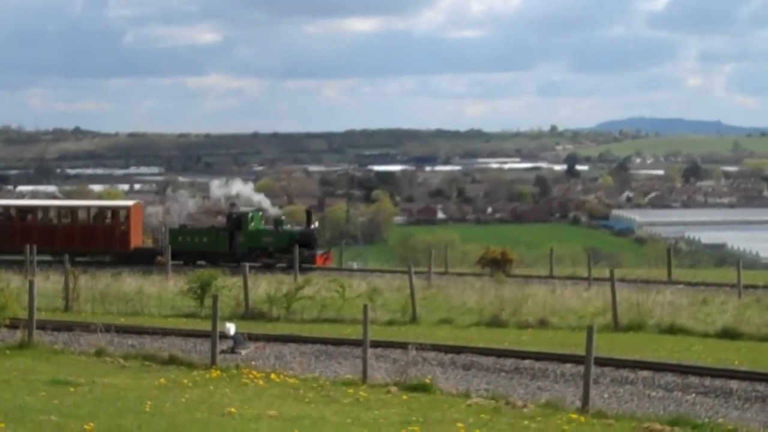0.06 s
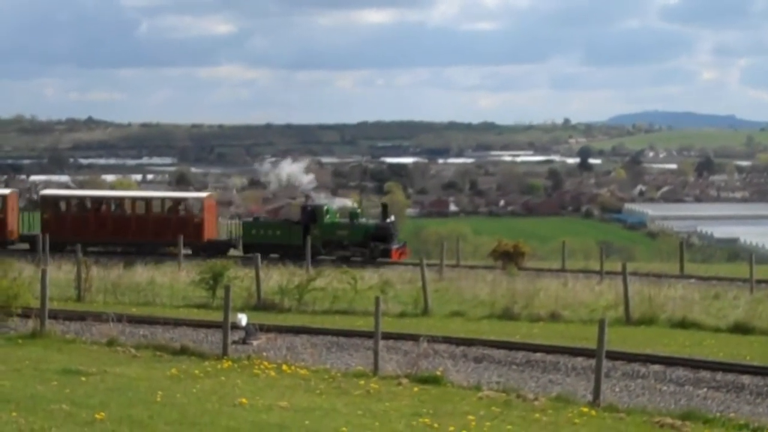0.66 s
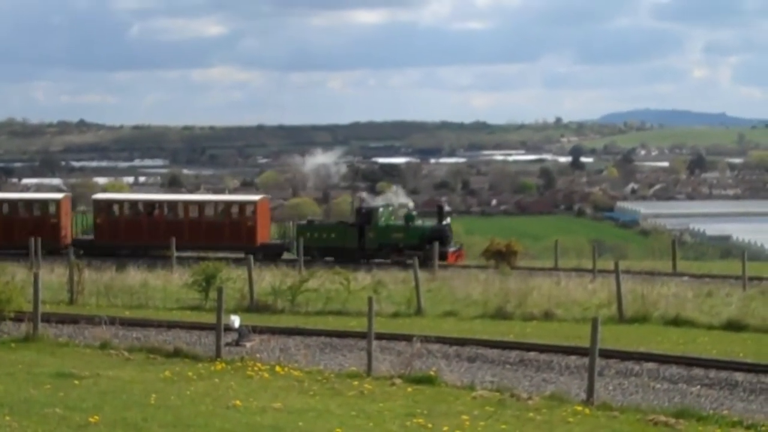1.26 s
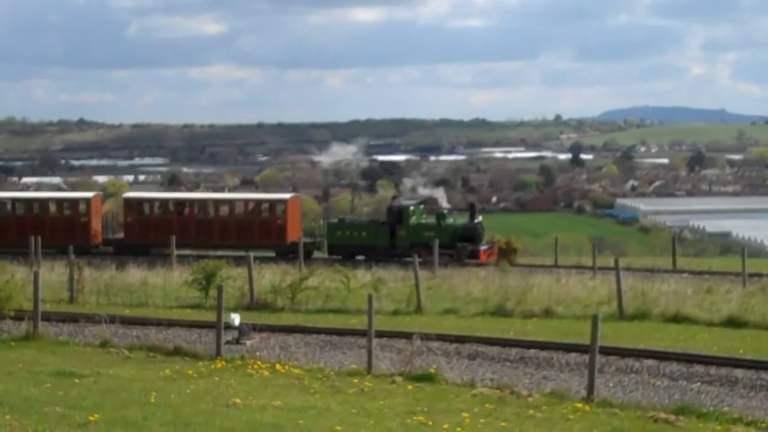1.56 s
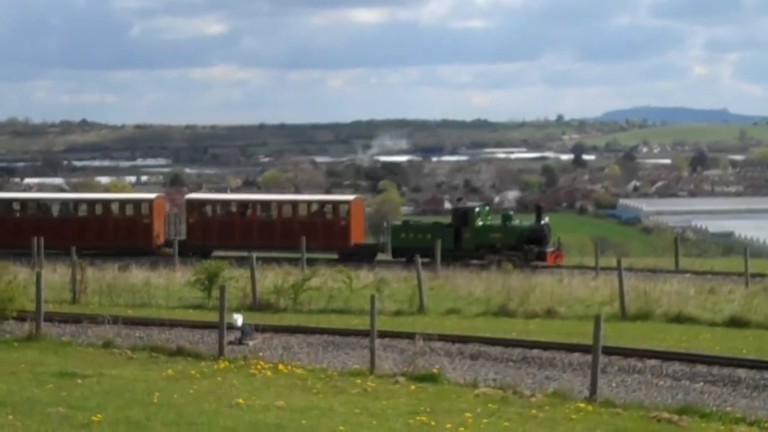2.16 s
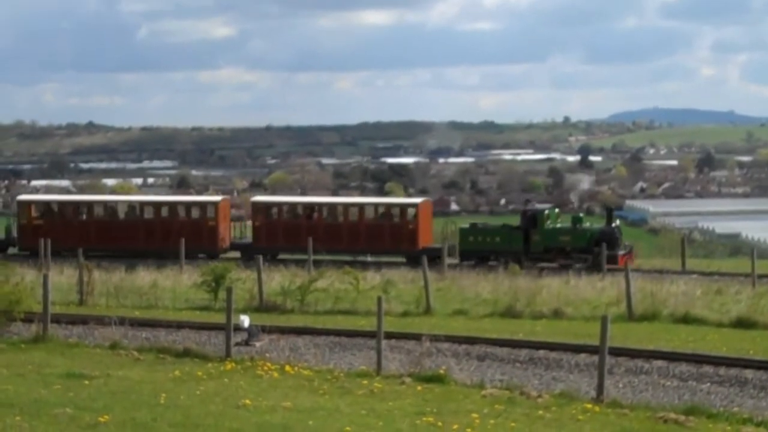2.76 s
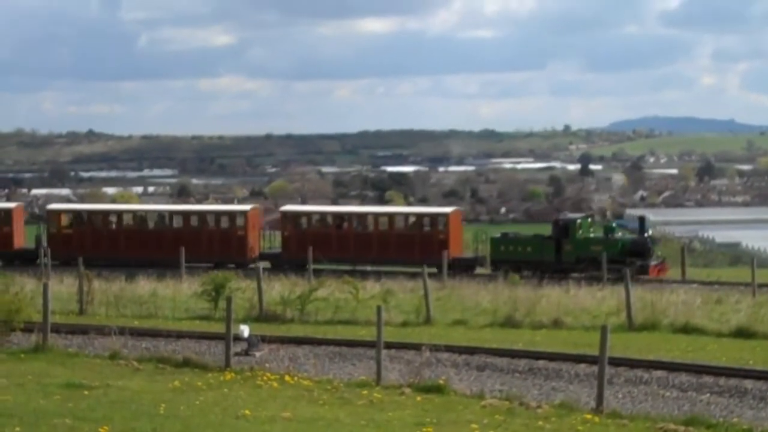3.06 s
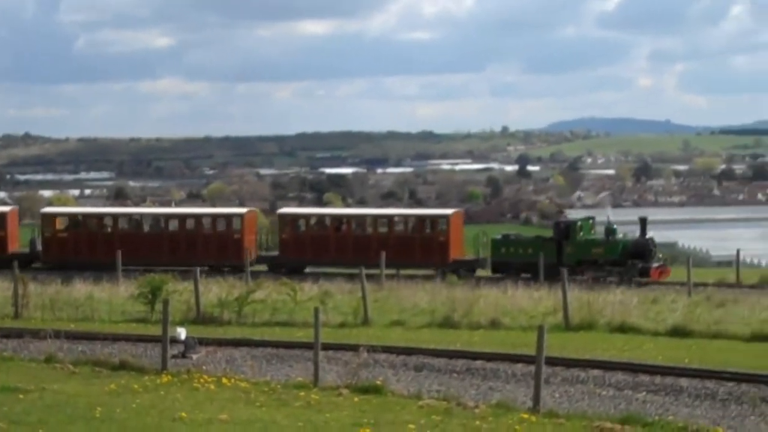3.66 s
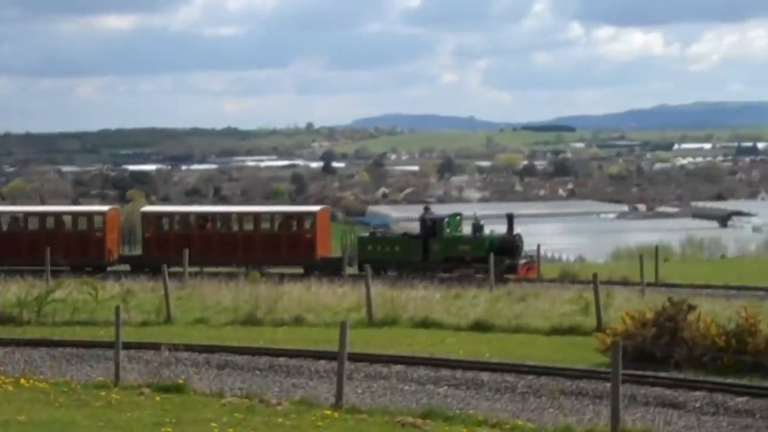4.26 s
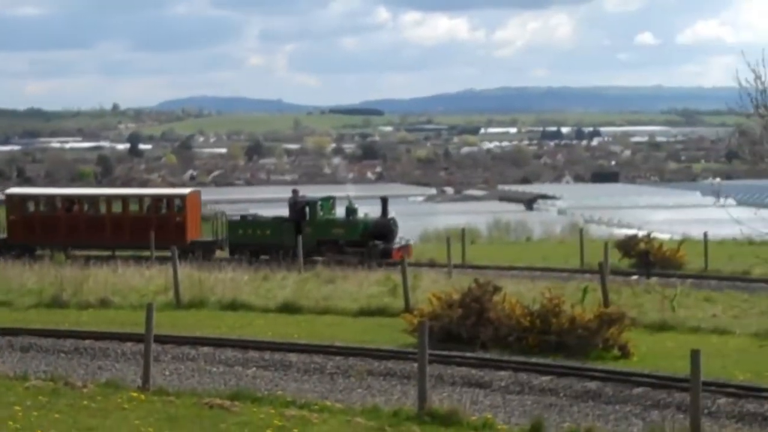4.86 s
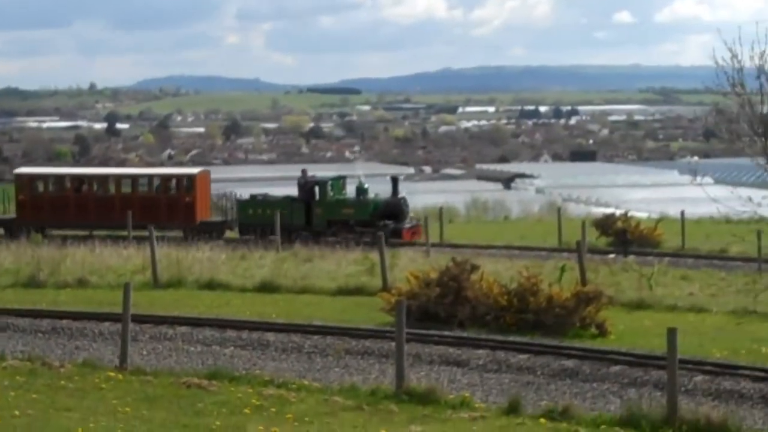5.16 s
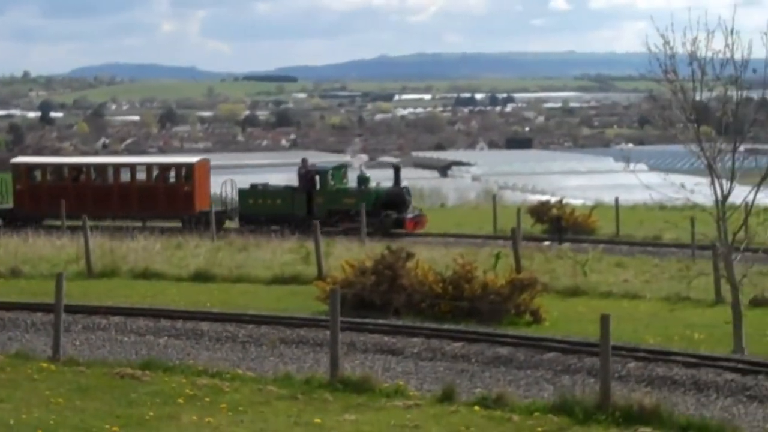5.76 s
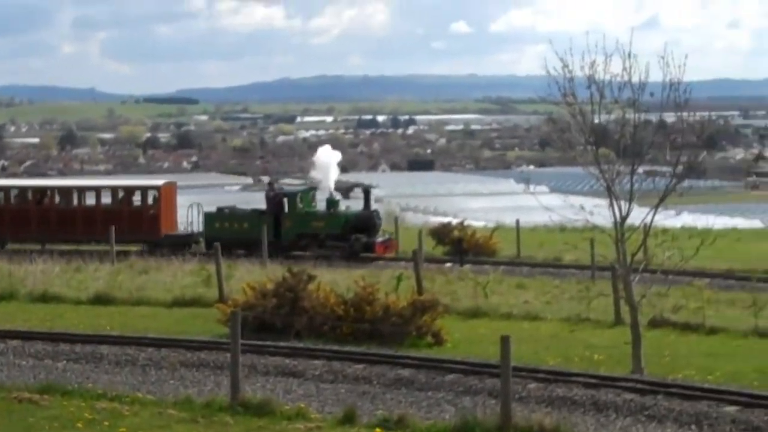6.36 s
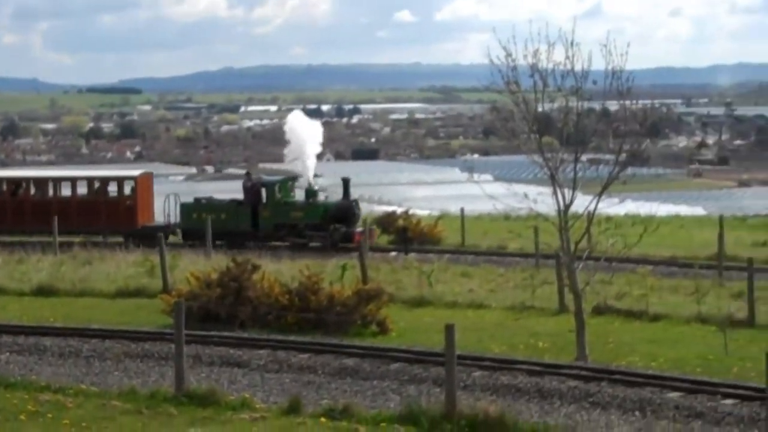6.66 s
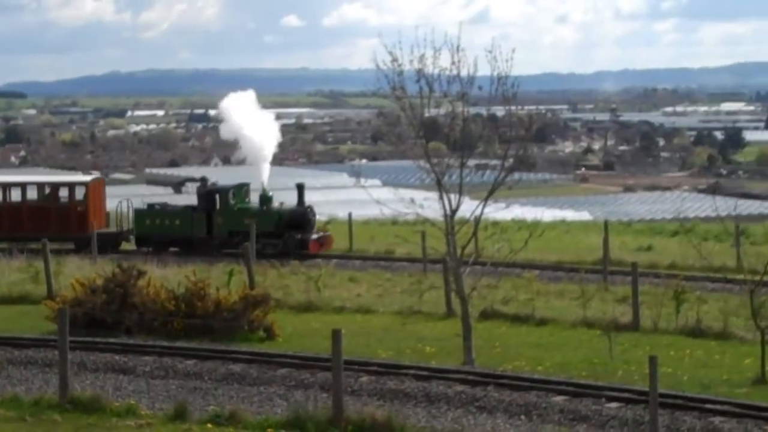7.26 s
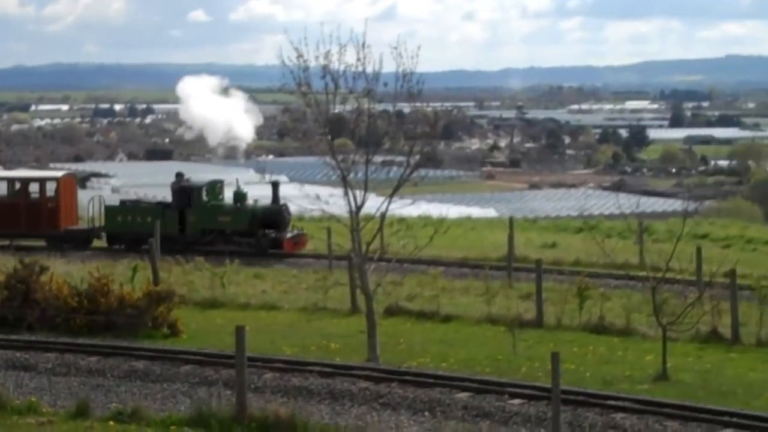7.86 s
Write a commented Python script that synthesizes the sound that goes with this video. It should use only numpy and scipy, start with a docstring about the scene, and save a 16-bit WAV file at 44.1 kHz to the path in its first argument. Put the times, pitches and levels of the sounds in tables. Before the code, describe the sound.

Wheels knock and couplings clank as a little steam train rolls by, ending with a single steamy whistle in a light breeze.

```python
"""A small steam train coasts past across a field. Its wheels roar on uneven rail, knock over the
joints and ring; couplings clash, chains rattle and steam leaks. A bird sings briefly, distant roads
and grass murmur, and a light breeze buffets the camera's microphone. Near the end a jet of steam
blows the whistle once: its pitch rises as the pipe heats, and it echoes off the land."""
import sys
import numpy as np
from scipy import signal
from scipy.fft import rfft, irfft
from scipy.io import wavfile

SR = 44100
rng = np.random.default_rng(int(sys.argv[2]) if len(sys.argv) > 2 else 0)


def wav_out(sig):
    """Save sig, one row per channel (or a flat mono array), as 16-bit PCM at SR to the path in sys.argv[1]."""
    wavfile.write(sys.argv[1], SR, np.round(np.clip(np.atleast_2d(sig).T, -1, 1) * 32767).astype(np.int16))


N = 352794
TIME = np.arange(N) / SR

# The bright clash and the dull body of a knock. Each row: frequency in Hz, relative level in dB.
CLASH_SPECTRUM = [(1500, -16), (3000, -1), (4200, 7), (5600, 9), (7400, 7), (8200, 1), (9000, -26),
                  (11500, -42)]
BODY_SPECTRUM = [(150, -3), (400, -7.5), (700, -2.5), (1200, 1), (2400, 5), (3200, -1.5), (4500, -6)]


def undb(db):
    """Turn decibels into a number to multiply a sound by."""
    return 10 ** (np.asarray(db) / 20)


def unit(x):
    """Scale a signal to an average strength (rms) of 1."""
    return x / np.sqrt(np.mean(x ** 2))


def curves(table):
    """Join each column's values by straight lines; the first column gives the times."""
    s, *columns = np.transpose(table)
    return [np.interp(TIME, s, column) for column in columns]


def ramp(start_s, length_s):
    """Rise from 0 to 1 in a straight line, then hold."""
    return np.clip((TIME - start_s) / length_s, 0, 1)


def colour(x, spectrum):
    """Filter a sound by rows of frequency in Hz and gain in dB, fading beyond the end rows."""
    hz, db = np.transpose(spectrum)
    f = np.maximum(np.fft.rfftfreq(x.shape[-1], 1 / SR), 1)
    edge_fade = np.minimum(f / hz[0], 1) * np.minimum(hz[-1] / f, 1) ** 2
    gain = undb(np.interp(np.log(f), np.log(hz), db))
    return irfft(rfft(x) * edge_fade * gain, x.shape[-1])


def noise(spectrum, size=N):
    """Noise of strength 1, shaped by a spectrum."""
    return unit(colour(rng.standard_normal(size), spectrum))


def wander(rate_hz, size=N):
    """A smooth random curve of strength 1 that moves up to about rate_hz times a second."""
    f = np.fft.rfftfreq(size, 1 / SR)
    return unit(irfft(rfft(rng.standard_normal(size)) / (1 + (f / rate_hz) ** 2), size))


def add(track, s, sound):
    """Mix a sound into a track, starting at s seconds."""
    i = max(int(s * SR), 0)
    track[i:i + len(sound)] += sound[:max(N - i, 0)]


def roll_and_leak(roll_db=1):
    """Wheels roar on uneven rail, and steam leaks steadily from the engine."""
    # Each row: time in seconds, relative level of the roar in dB, level of the leak in dB.
    levels = [(0.0, -42, -42.5), (0.74, -42.5, -47), (2.55, -41, -42), (3.12, -42.5, -44.5),
              (3.54, -40.5, -41), (4.79, -43.5, -42.5), (6.15, -42.5, -42.5)]
    # The wheels' roar and the steam's hiss. Each row: frequency in Hz, relative level in dB.
    roll_spectrum = [(100, 12.5), (320, -6), (600, 3.5), (760, -2), (950, 3), (1200, -1), (1550, 3.5),
                     (1800, -2), (2050, 3), (2600, 2), (2950, -4), (3700, -2), (4500, -7), (8000, -57)]
    leak_spectrum = [(2500, -49), (4200, -7), (5200, -4), (5800, 0.5), (6250, 0), (6650, 5), (7050, -2.5),
                     (7400, 2), (8000, -5), (8800, -9), (10200, -18), (11800, -23)]
    roar_db, steam_db = curves(levels)
    roll = noise(roll_spectrum) * undb(roar_db + roll_db + 1.2 * wander(26))
    leak = noise(leak_spectrum) * undb(steam_db + 0.48 * wander(19))
    return roll + leak


def rattle(ticks_per_s=110, spread_db=2, fade_s=0.046, db=-47):
    """Loose chains and fittings tick faintly at random; each tick falls 60 dB in fade_s."""
    ticks = rng.random(N) < ticks_per_s / SR
    ticks = ticks * undb(spread_db * np.clip(rng.standard_normal(N), -2, 1))
    envelope = signal.lfilter([1], [1, -undb(-60 / (fade_s * SR))], ticks)
    return undb(db) * unit(envelope * (noise(BODY_SPECTRUM) + 1.03 * noise(CLASH_SPECTRUM)))


def countryside(db=-52):
    """A faint, wide wash of distant roads and rustling grass."""
    # The tone of the wash. Each row: frequency in Hz, relative level in dB.
    spectrum = [(130, 20), (210, 22), (320, -24), (600, -31), (1050, 16.5), (1600, -8), (2500, -4),
                (3000, 6.5), (3700, 15.5), (4300, -36), (8000, -36)]
    return undb(db) * np.array([noise(spectrum), noise(spectrum)])


def breeze(shared=0.16):
    """Swirling air buffets both microphone openings, mostly the right one, which faces the wind."""
    # The wind's deep rumble and higher flutter. Each row: frequency in Hz, relative level in dB.
    rumble_spectrum = [(18, -15), (35, -4), (60, -5), (95, 3), (125, -2), (190, -3), (245, -9), (310, -52)]
    flutter_spectrum = [(80, -20), (140, 0.5), (200, 0.5), (250, -3), (330, -10), (450, -13), (650, -16),
                        (1200, -37)]
    # Each row: peak time and half length in seconds, relative rumble and flutter levels in dB.
    gusts = [(4.83, 2, -48.5, -77), (4.6, 0.35, -43, -62), (6.8, 0.22, -41, -35), (7.7, 0.43, -39, -33)]
    rumble_gain, flutter_gain = undb(-64), undb(-55.5)  # light air between the gusts
    for s, half_s, rumble_db, flutter_db in gusts:
        swell = np.exp(-((TIME - s) / half_s) ** 4)  # rises, holds and drops
        rumble_gain = np.hypot(rumble_gain, swell * undb(rumble_db))
        flutter_gain = np.hypot(flutter_gain, swell * undb(flutter_db))
    common = noise(rumble_spectrum)
    separate = np.array([noise(rumble_spectrum), noise(rumble_spectrum)])
    rumble = np.sqrt(shared) * common + np.sqrt(1 - shared) * separate
    flutter = np.array([noise(flutter_spectrum), noise(flutter_spectrum)]) * undb(1.2 * wander(12))
    return undb([[-6], [3]]) * rumble * rumble_gain + undb([[-8], [3]]) * flutter * flutter_gain


def ground_scatter(x, fade_s, build_s, size=32768):
    """Sound scatters off the ground and slopes into a soft tail, different in each ear."""
    t = np.arange(size) / SR
    tails = rng.standard_normal((2, size)) * undb(-60 * t / fade_s) * (1 - np.exp(-t / build_s))
    tails /= np.sqrt(np.sum(tails[0] ** 2))
    mid, side = colour(tails, [(200, -14.5), (2200, 8.5), (8000, -3)])
    left_right = np.array([mid + 0.61 * side, mid - 0.61 * side])
    return signal.fftconvolve(x[None], left_right, axes=1)[:, :N]


def blows(jolts_per_s=3):
    """List the blows from couplings, wheels and faint jolts, in rows like those of single_knocks."""
    # Separately timed steel knocks from couplings and wheels. Each row: start in seconds,
    # relative clash and body levels in dB, seconds to fade by 60 dB.
    single_knocks = [(0.126, -36.5, -33.5, 0.15), (0.646, -38, -35.5, .07), (0.794, -31, -45, .05),
                     (0.853, -39.5, -38, 0.25), (2.672, -23, -27, 0.13), (2.816, -32.5, -39, 0.083),
                     (3.718, -35.5, -39.5, .066), (3.983, -34.5, -30.5, 0.25), (4.208, -32, -31.5, .055),
                     (4.243, -34.5, -37, .11), (4.821, -35, -40, 0.076), (5.486, -34, -38.5, 0.21),
                     (5.704, -34.5, -42, 0.21), (5.735, -30, -39, 0.19), (6.17, -36, -37.5, 0.19),
                     (7.78, -32.5, -35.5, .13), (7.936, -32, -36.5, .16)]
    # Pairs of axles cross rail joints. Each row: start in seconds, relative levels in dB of the
    # first clash, the second clash and the body, seconds for the first knock to fade by 60 dB.
    axle_pairs = [(0.242, -34, -32.5, -31.5, 0.19), (0.688, -37, -38, -33, .07),
                  (1.08, -22, -44, -27.5, 0.12), (1.498, -33.5, -27, -33, 0.16),
                  (1.639, -43, -37, -32.5, 0.13), (1.766, -25.5, -31, -31, .045),
                  (2.08, -40, -39, -30.5, .1), (2.339, -29, -29.5, -29.5, 0.042),
                  (2.91, -35, -28.5, -33.5, 0.061), (3.338, -24, -26.5, -31.5, .13),
                  (4.35, -31, -33.5, -41, 0.22), (4.994, -25, -26.5, -32, 0.087),
                  (5.586, -26, -31, -35, 0.059), (5.675, -48, -35, -33.5, 0.047)]
    # The second axle lags more as the train slows. Each row: time in seconds, lag in seconds.
    axle_lags = [(1.8, 0.21), (2.3, .2165), (5.0, .219), (5.6, .2172)]
    rows = list(single_knocks)
    for s, first_db, second_db, body_db, fade_s in axle_pairs:
        lag_s = np.interp(s, *np.transpose(axle_lags))
        rows.append((s, first_db, body_db, fade_s))
        rows.append((s + lag_s, second_db, body_db - 0.5, 0.058))  # rings briefly and thuds less
    for k, chance in enumerate(rng.random(size=24)):  # the carriages jolt at random
        rows.append(((k + chance) / jolts_per_s, -42, -36, 0.095))
    return rows


def knocks(rise_s=0.0014, hold_s=0.0023, crack_s=0.0018, chatter_db=3, patchy_db=5, size=8192):
    """Steel strikes steel: a brief, bright crack, then many vibrations that chatter and die away."""
    # The first hard contact. Each row: frequency in Hz, relative level in dB.
    crack_spectrum = [(1500, -9.5), (5000, 6.5), (8000, 10), (10500, -22)]
    # Strong tones in every knock. Each row: frequency in Hz, level in dB against the noisy ring.
    steel_tones = [(1850, -19), (2430, -14.5), (4100, -21), (5600, -25), (6700, -23)]
    out, t = np.zeros(N), np.arange(size) / SR
    band_hz = np.geomspace(300, 11000, num=90)
    for s, clash_db, body_db, fade_s in blows():
        clash = undb(clash_db) * noise(CLASH_SPECTRUM, size)
        body = undb(body_db + 0.5) * noise(BODY_SPECTRUM, size)
        strength = np.std(clash + body)
        band_db = patchy_db * rng.standard_normal(len(band_hz))  # each contact rings differently
        ring = unit(colour(clash + body, np.c_[band_hz, band_db]))
        for hz, db in steel_tones:
            ring += undb(db) * np.sqrt(2) * wander(150, size) * np.sin(2 * np.pi * hz * t)
        decay_db = -60 * np.maximum(t - hold_s, 0) / fade_s
        chatter = chatter_db * np.tanh(wander(160, size))
        envelope = np.minimum(t / rise_s, 1) * undb(decay_db + chatter)
        add(out, s - rise_s / 2, strength * ring * envelope)
        crack = noise(crack_spectrum, size) * np.exp(-t / crack_s)
        add(out, s, undb(clash_db + 1) * crack)
    return out


def bird(note_s=0.039, ragged_db=4, waver=0.013):
    """A bird sings quick, sliding notes from a hedge far off to the right."""
    # Each row: start in seconds, first and last pitch in Hz, relative level in dB.
    notes = [(0.168, 3030, 2950, -32), (0.212, 3850, 4400, -33), (0.353, 5300, 4700, -30),
             (0.467, 2800, 3380, -36), (0.55, 4250, 4080, -33), (0.582, 3650, 3150, -35),
             (0.8, 3080, 3320, -35), (0.862, 3580, 3250, -35)]
    song, size = np.zeros(N), int(note_s * SR)
    for s, start_hz, end_hz, db in notes:
        hz = np.linspace(start_hz, end_hz, size) * (1 + waver * wander(150, size=4096)[:size])
        chirp = np.sin(2 * np.pi * np.cumsum(hz) / SR)
        add(song, s, undb(db) * chirp * np.sqrt(np.hanning(size)))
    song *= undb(ragged_db * np.tanh(wander(80.2)) + 0.5)
    return np.array([-0.22 * song, song]) + undb(-19) * ground_scatter(song, fade_s=0.41, build_s=0.01)


def wheel_rings(waver_db=2.5, rise_s=0.0011, size=16384):
    """A struck wheel sings on at a single pitch, wavering in level as it turns."""
    # Each row: start in seconds, pitch in Hz, level in dB, seconds to fade by 60 dB.
    rings = [(1.501, 2420, -17.5, 0.049), (1.713, 2430, -23.5, 0.045), (2.07, 2450, -20, 0.051),
             (2.48, 7330, -44, .6), (3.13, 3700, -41, 0.36), (3.385, 5830, -40, .34),
             (4.922, 1860, -27.5, 0.041), (5.493, 7380, -31.5, 0.36), (5.894, 2400, -23.5, 0.038)]
    out, t = np.zeros(N), np.arange(size) / SR
    for s, hz, db, fade_s in rings:
        envelope = undb(db - 60 * t / fade_s) * (1 - np.exp(-t / rise_s))
        add(out, s, np.sin(2 * np.pi * hz * t) * envelope)
    return out * undb(waver_db * wander(90))


def whistle(opens_s=6.17, sounds_s=6.27, shuts_s=7.498, valve_s=0.026, swell_s=0.21, drying_s=0.14,
            sag_hz=41.9, jitter_hz=2.95, rough=0.13, jet_db=-22.4, spit_db=-23, pipe_db=-42):
    """A churning steam jet blows a pipe closed at one end; its hiss pulses with the note."""
    # The note rises as the pipe heats. Each row: time in seconds, full-blown pitch in Hz, level in dB.
    note = [(6.3, 666.3, -12.5), (6.7, 704, -11), (6.745, 717, -11), (6.83, 708.8, -12.5),
            (6.92, 711.4, -13), (7.02, 710.5, -12), (7.2, 716, -12), (7.29, 712.3, -12.5),
            (7.42, 714.5, -11)]
    # Each row: time in seconds, levels of the second and third harmonics in dB against the first.
    overtones = [(6.3, -24.5, -14), (6.5, -23, -15.5), (6.7, -19, -9.5), (6.9, -18.5, -10.5),
                 (7.15, -17, -13.5), (7.5, -15.5, -15)]
    # The hissing jet and the spitting wet steam. Each row: frequency in Hz, relative level in dB.
    jet_spectrum = [(300, -46), (560, -16), (850, -19), (980, 0), (1250, -15), (1550, -3), (1800, -7.5),
                    (2300, -2.5), (2950, -5.5), (3350, 2.5), (4000, -5.5), (4850, 3.5), (5350, -1.5),
                    (6100, 3), (6850, -1.5), (7450, 3.5), (8500, -12), (9200, -19.5), (11800, -24)]
    spit_spectrum = [(2300, -5.5), (2720, -4), (2980, -2), (3350, 5), (4000, -13), (5900, 4.5), (6800, -16),
                     (7500, -8), (9000, -18), (11800, -18)]
    hz, note_db = curves(note)
    second_db, third_db = curves(overtones)
    valve = ramp(opens_s, valve_s) - ramp(shuts_s, valve_s)
    flow = valve * undb(-19 * (1 - ramp(opens_s, swell_s)))  # the steam starts weak and swells
    sounding = valve * ramp(sounds_s, length_s=0.1258)  # the pipe sounds once the jet is strong enough
    # The cold pipe first blows out its water, spitting and reedy, then runs dry.
    wet = np.exp(-np.maximum(TIME - opens_s - swell_s, 0) / drying_s)
    fourth_db = -27 + 8 * wet
    sag = sag_hz * (1 - sounding) ** 2  # the note is flat when barely blown
    phase = 2 * np.pi * np.cumsum(hz - sag + jitter_hz * wander(83)) / SR
    tone = np.sin(phase) * (1 + 0.058 * wander(34))
    for k, db in enumerate([second_db, third_db, fourth_db], 2):
        harmonic = np.sin(k * phase) * (1 + rough * wander(76)) + rough * wander(70) * np.cos(k * phase)
        tone += sounding * undb(db) * harmonic
    # The churning rings the pipe: a narrow band of noise around harmonics 1 and 3.
    pipe = sum(wander(48) * np.sin(k * phase) + wander(55) * np.cos(k * phase) for k in (1, 3))
    jet = unit(noise(jet_spectrum) * (1 + 0.092 * np.sin(phase)))
    jet *= undb(0.5 * wander(30) + wander(380))
    jet *= undb(opens_s - TIME)  # fades 1 dB a second as the engine draws away
    spit = wet * noise(spit_spectrum) * undb(2 * wander(160))
    steam = undb(jet_db) * jet + undb(spit_db) * spit + undb(pipe_db) * pipe
    return sounding * np.sqrt(2) * tone * undb(note_db) + flow * steam


def far_echoes(x):
    """Slopes and buildings across the fields send back faint, separate, duller echoes."""
    # Each row: delay in seconds, relative level in dB.
    echoes = [(.062, -26.5), (.125, -37), (.2, -33.5)]
    out = np.zeros(N)
    for delay_s, db in echoes:
        add(out, delay_s, undb(db) * x)
    return colour(out, [(700, -1), (2100, -2), (4000, -12), (8000, -12)])


def scene():
    """Mix the train, its echoes, the bird, the countryside and the breeze in stereo."""
    clatter = knocks() + wheel_rings() + rattle()
    blast = whistle()
    scattered = undb(-29) * ground_scatter(clatter, fade_s=0.022, build_s=0.0039)
    scattered += undb(-21) * ground_scatter(blast, fade_s=0.78, build_s=0.0039)
    train = clatter + blast + scattered + far_echoes(blast) + roll_and_leak()
    return train + bird() + countryside() + breeze()


def record(dry, scatter_fade_s=0.1, top_hz=11500, size=4096):
    """The two microphone openings colour the treble differently, and the camera cuts off the top."""
    # How the openings differ. Each row: frequency in Hz, left level minus right level in dB.
    balance = [(700, -0.2), (1400, -1), (5000, 0.96), (7050, -0.5), (7400, 15.5), (7850, 21), (8400, 12),
               (9500, 8), (11500, 1)]
    # Treble that the camera body scatters into the right opening. Each row: frequency in Hz, gain in dB.
    scatter_spectrum = [(6000, -56), (7000, -20), (7400, -1), (8000, -10.5), (9000, -0.5), (11500, -6)]
    hz, balance_db = np.transpose(balance)
    ratio = undb(np.interp(np.fft.rfftfreq(N, 1 / SR), hz, balance_db))
    left = irfft(rfft(dry[0]) * 2 * ratio / (1 + ratio), N)
    right = irfft(rfft(dry[1]) * 2 / (1 + ratio), N)
    decay = undb(-60 * np.arange(size) / SR / scatter_fade_s)
    tail = unit(rng.standard_normal(size) * decay) / np.sqrt(size)
    right += colour(signal.fftconvolve(dry[1], tail)[:N], scatter_spectrum)
    low_pass = signal.ellip(10, 0.2, 80, top_hz, fs=SR, output="sos")
    return signal.sosfilt(low_pass, [left, right])


dry = scene()
out = record(dry)
wav_out(out)
```